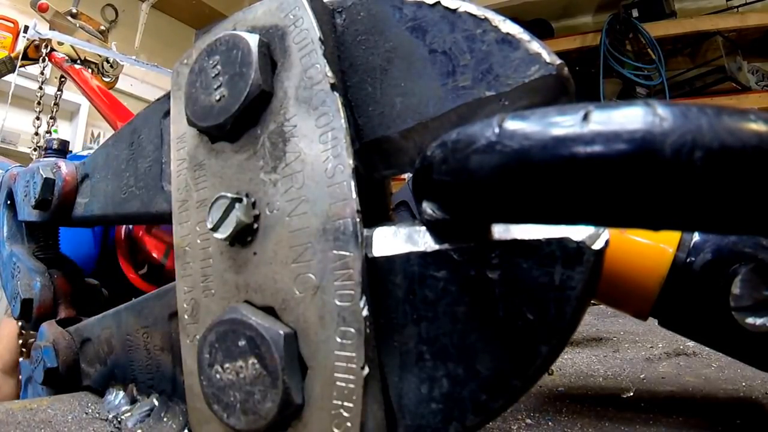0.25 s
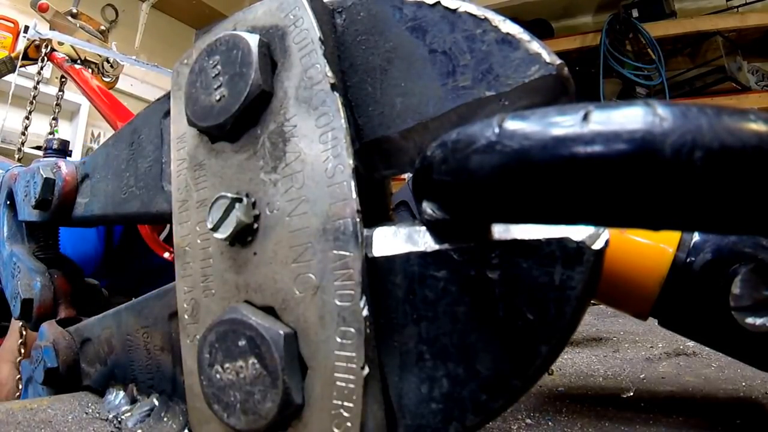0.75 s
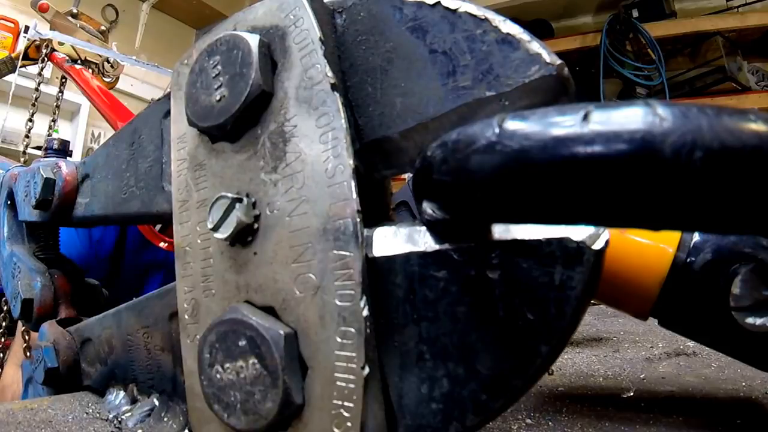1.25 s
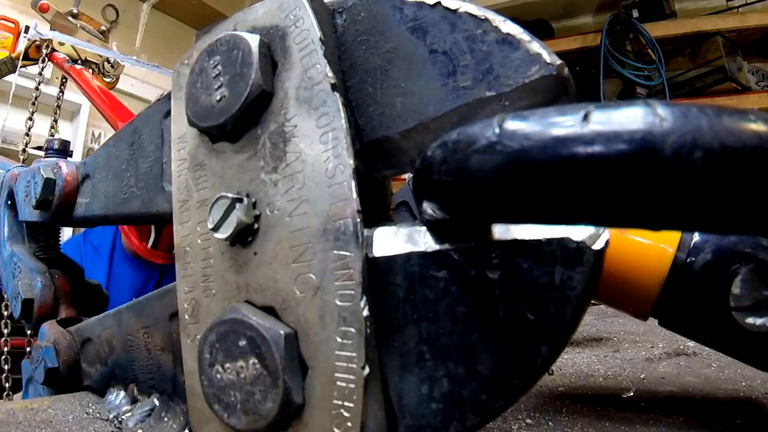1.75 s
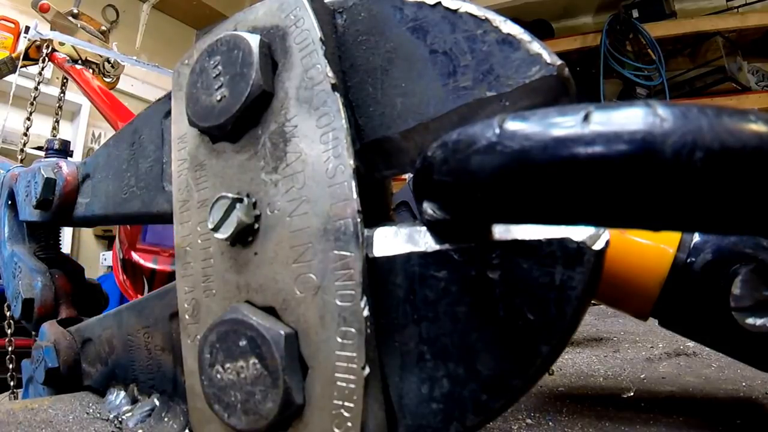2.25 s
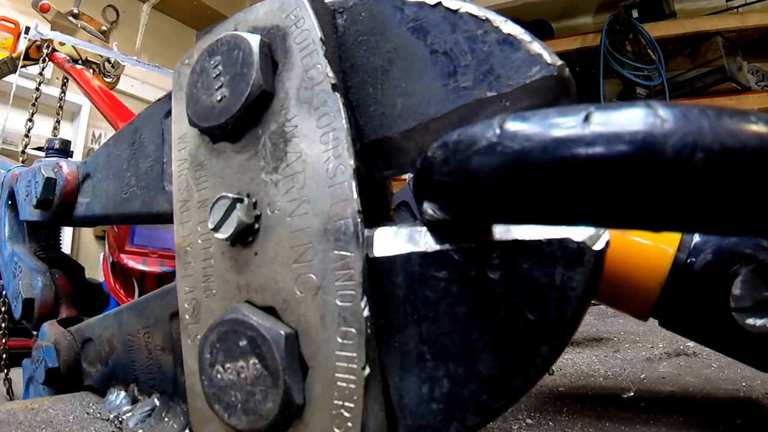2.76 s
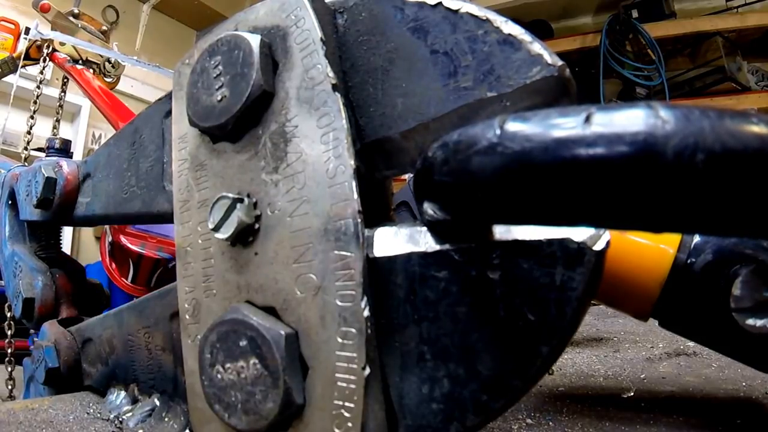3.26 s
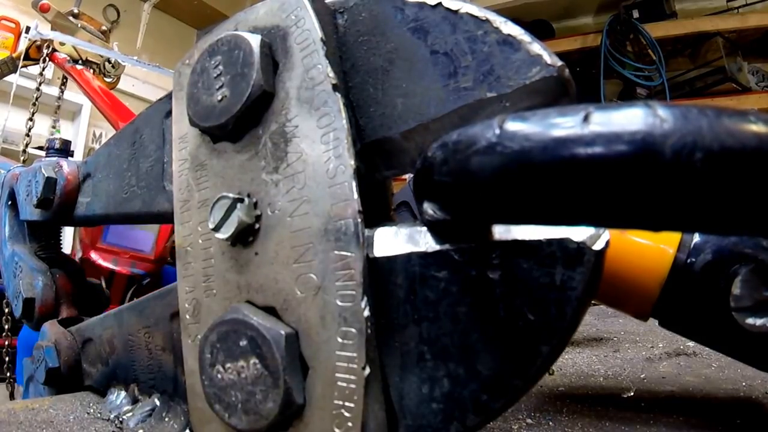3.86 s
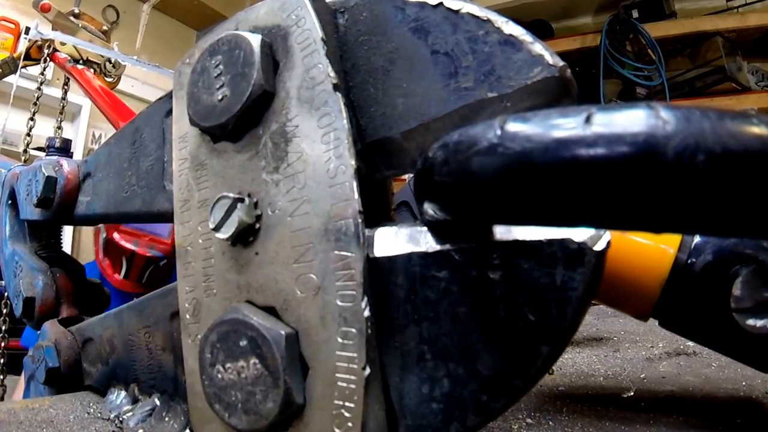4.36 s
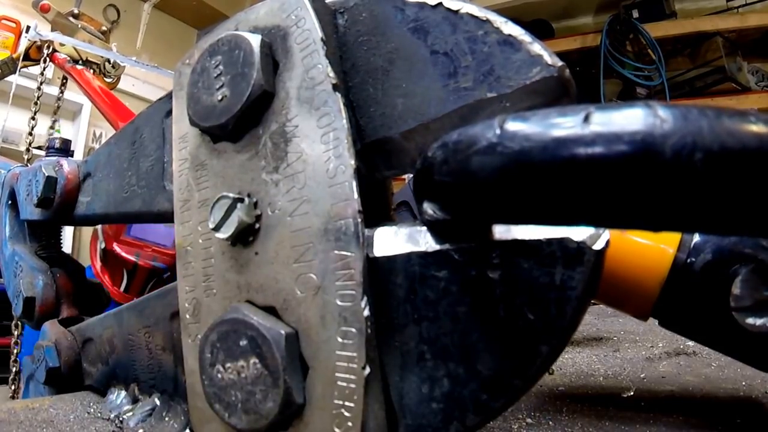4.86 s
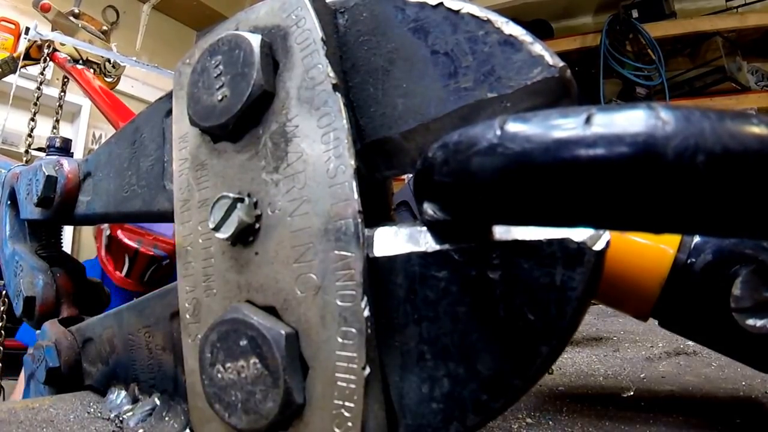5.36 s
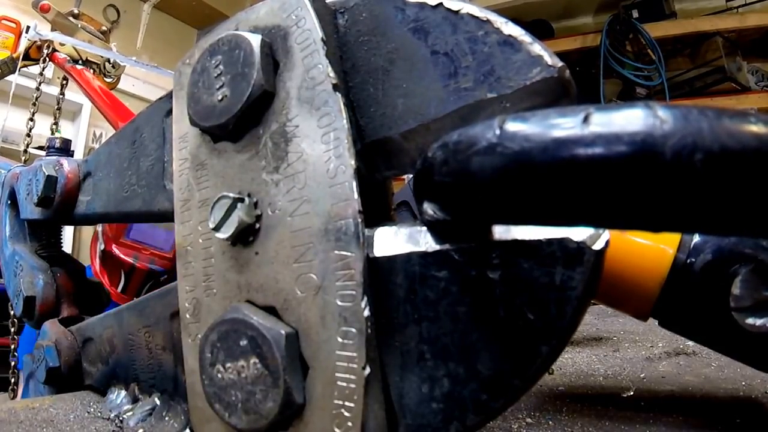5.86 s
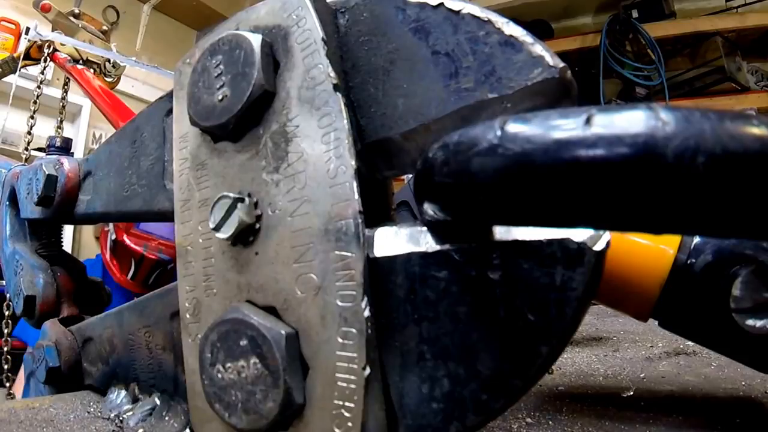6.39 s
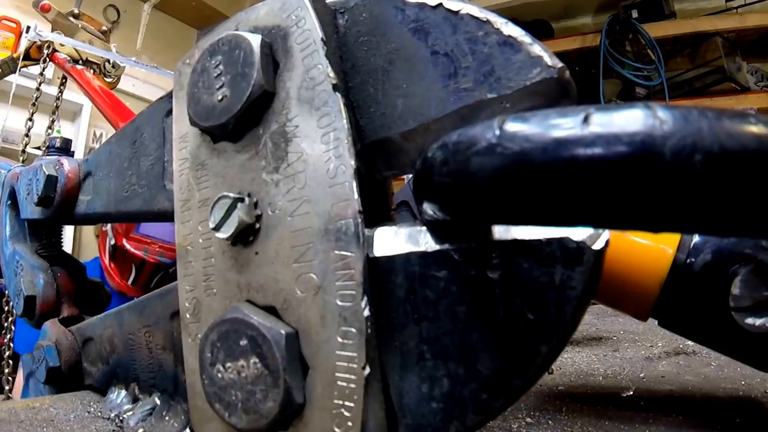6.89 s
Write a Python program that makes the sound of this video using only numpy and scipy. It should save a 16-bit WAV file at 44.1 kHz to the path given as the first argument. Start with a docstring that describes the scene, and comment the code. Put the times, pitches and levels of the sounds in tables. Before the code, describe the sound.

Soft chain rustle and light clinks over a quiet room and faint hiss, then a first strong ratchet clank near two and a half seconds. After a brief lull, a lever hoist clacks repeatedly, each stroke a tight run of bright steel snaps and woody-sounding rig thumps, plus low scraping and sway. Mono, close, contact-like microphone in a hard, short-reverberating workshop.

```python
"""Slack chain brushes softly, then a lever chain hoist clanks in a workshop as it is cranked, close to a
small camera standing on the loaded steel rig. Clanks are grainy noise bursts through the steel's modes; chain
drags and brushes as filtered grains. Jolts boom through the rig, mostly near 330 Hz, as swelling cosines;
single parts ring as wavering sines. Behind them the rig hums, scrapes and sways, and the shop answers."""
import sys
import numpy as np
from scipy import signal
from scipy.fft import rfft, irfft, next_fast_len
from scipy.io import wavfile
from scipy.ndimage import uniform_filter1d, map_coordinates

SR = 44100
rng = np.random.default_rng(int(sys.argv[2]) if len(sys.argv) > 2 else 0)


def gain_from_db(level_db):
    """Convert decibel levels to linear amplitude factors (20 dB per decade)."""
    decades = np.asarray(level_db, float) / 20
    return 10 ** decades


def generate_wav(sig):
    """Save sig (samples, or channels by samples) to the path in sys.argv[1] as 16-bit PCM at SR."""
    pcm = np.round(np.clip(np.atleast_2d(sig).T, -1, 1) * 32767).astype(np.int16)
    wavfile.write(sys.argv[1], SR, pcm)


N = 314433  # samples

# Modes of the hoist steel. Each row: centre in Hz, width in Hz, level in dB.
STEEL = [(850, 8.1, 1.5), (921, 8.3, 1), (1200, 250, -14.5), (1273, 15, 3.5), (1528, 46, -1.5),
         (1730, 50, 1), (2250, 63, -3.5), (2577, 42, -1), (2960, 27, -20.5), (3308, 13, -1.5),
         (4050, 18, -10), (4670, 46, -38), (4953, 66, -7), (5200, 17, -4), (6600, 17, -17), (7400, 56, -22),
         (9310, 70, -20.5)]
# Jolts through the rig, and a few long quiet hums of the rig while the lever is pulled (near 3.62, 4.31, 4.66,
# 5.32 and 5.51 s). Each row: time of the peak in seconds, level in dB, boom in Hz, nominal t60 in seconds.
JOLTS = [(.27, -28.5, 157.5, 0.18), (1.029, -31.5, 373, .11), (1.181, -34.5, 210, 0.13),
         (1.39, -42, 222, 0.17), (2.218, -27, 396, 0.14), (2.2744, -21, 360, 0.11),
         (2.3128, -18.5, 387, 0.033), (2.396, -17, 393, 0.056), (2.4103, -10.5, 316, 0.045),
         (2.429, -13, 396, 0.064), (2.4472, -12, 384, 0.077), (2.4689, -14, 313, 0.011),
         (2.5326, -7, 361, 0.03), (2.5485, -12, 288, 0.012), (2.682, -27.5, 420, 0.098),
         (2.738, -26, 333, 0.04), (3.2642, -20, 297, 0.039), (3.2785, -19, 339, 0.064),
         (3.303, -27, 323, .044), (3.327, -26, 328, 0.1), (3.362, -9, 308.4, 0.096),
         (3.4305, -19.5, 344, .14), (3.578, -25.5, 305, 0.094), (3.617, -41, 334, 0.089),
         (3.654, -4.5, 276, 0.016), (3.6864, -16, 276, 0.052), (3.7062, -26, 393, 0.055),
         (3.857, -26.5, 385, 0.032), (3.904, -25, 367, 0.039), (3.9757, -11.5, 346, 0.029),
         (3.99, -10, 387, 0.011), (4.1049, -12.5, 283, .038), (4.1303, -22, 252, 0.013),
         (4.312, -25.5, 307, 0.11), (4.3508, -14.5, 332, 0.03), (4.3786, -21.5, 383, 0.1),
         (4.4387, -11, 319, 0.097), (4.4967, -16.5, 299, 0.033), (4.563, -24.5, 305, 0.097),
         (4.66, -28.5, 332, 0.25), (4.7013, -22.5, 344, 0.12), (4.7424, -6.5, 275, .032),
         (4.7614, -23, 303, .04), (4.9865, -10.5, 326, 0.049), (5.0032, -14, 338, 0.036),
         (5.1178, -11.5, 378, 0.035), (5.276, -26, 321, 0.099), (5.315, -29.5, 335, 0.29),
         (5.3526, -16.5, 331, .036), (5.417, -13.5, 334, 0.017), (5.435, -19, 347, 0.082),
         (5.4516, -14.5, 310, 0.035), (5.511, -27, 335, 0.087), (5.556, -22, 347, 0.075),
         (5.6849, -22.7, 335, 0.046), (5.7008, -21, 332, 0.099), (5.7285, -7.5, 285, 0.042),
         (5.8214, -16, 380, 0.0088), (5.8691, -21.5, 335, 0.12), (5.9738, -11, 380, 0.007),
         (5.997, -15.5, 300, 0.025), (6.1074, -15.5, 384, 0.036), (6.3835, -23.5, 331.6, 0.23),
         (6.4859, -11.5, 315, 0.074), (6.5009, -20.5, 330, 0.04), (6.42, -35, 334, 0.14),
         (6.601, -25.5, 335, 0.13), (6.765, -30, 340, 0.13), (6.8418, -6.5, 305, 0.023),
         (6.8765, -25, 243, 0.11), (7.094, -18, 362, 0.032)]
# Spectrum of chain links rubbing, before any tilt. Each row: frequency in Hz, level in dB per Hz.
LINKS = [(320, 11.5), (550, 5), (793, 1.5), (872, 0), (958, 5), (1170, 0), (2790, 1), (5000, -7.5),
         (6470, -6.5), (11000, -37.5), (12900, -49), (14000, -74)]
# Low modes of the rig against the floor. Each row: centre in Hz, width in Hz, level in dB.
SCRAPE = [(121.8, 42.7, -1.9), (205.7, 86, 1), (263, 110, -1.17)]


def unit(x):
    """Scaled to rms 1."""
    return x / np.sqrt(np.mean(x ** 2) + 1e-20)


def along(points, hz):
    """(Hz, value) points read on a log frequency axis."""
    f, v = np.transpose(points)
    return np.interp(np.log(hz + 1), np.log(f + 1), v)


def curves(rows):
    """One value per sample for each column after the time."""
    s, *cols = np.transpose(rows)
    return [np.interp(np.arange(N) / SR, s, c) for c in cols]


def filtered(x, response):
    """x passed through a complex response of frequency."""
    m = next_fast_len(x.shape[-1] + 8192)
    spectrum = rfft(x, m) * response(np.fft.rfftfreq(m, 1 / SR))
    return irfft(spectrum, m)[..., :x.shape[-1]]


def tilted(spectrum, slope_db):
    """A spectrum leaning by slope_db per octave about 3 kHz, with no bass well under its first point."""
    def response(hz):
        bass = (hz / (.4 * spectrum[0][0])).clip(0, 1) ** 3
        octaves = np.log2((hz + 1) / 3000).clip(-3, 2)
        return bass * gain_from_db(along(spectrum, hz) + slope_db * octaves)
    return response


def body(modes):
    """Causal response of a few resonances (Hz, width Hz, dB), with alternating signs."""
    def response(f):
        return sum((-1) ** k * gain_from_db(db) * 1j * f * w / (c * c - f * f + 1j * f * w)
                   for k, (c, w, db) in enumerate(modes))
    return response


def grit(size, spread_db, grain_s):
    """Many tiny contacts: noise whose level wanders from grain to grain."""
    knots = rng.standard_normal(int(size / SR / .0005) + 4)
    grain = np.arange(size) / SR / max(grain_s, .0005)
    return rng.standard_normal(size) * gain_from_db(spread_db * map_coordinates(knots, [grain]))


def swells(rows, rest_db):
    """Gain that rises and falls as a bell around each (s, dB, rise s, fall s), powers added over a rest level."""
    t = np.arange(SR) / SR - .5
    power = np.full(N + 2 * SR, gain_from_db(2 * rest_db))
    for s, db, rise, fall in rows:
        power[round(s * SR):][:SR] += gain_from_db(2 * db) * np.exp(-(t / np.where(t < 0, rise, fall)) ** 2)
    return np.sqrt(power[SR // 2:][:N])


def clanks():
    """Each clank is a clump of micro-contacts, heard directly and through the steel's modes at new strengths."""
    # Pawl and link clanks. Each row: start in seconds, relative level in dB, rattle t60 in seconds,
    # brightness in dB per octave.
    strikes = [(.0215, -47, 0.12, 6), (0.211, -33.5, 0.23, 3.5), (.3471, -40.5, 0.2, 2.5),
               (0.5022, -34.5, .19, 1), (0.6858, -34, 0.21, 0.5), (1.152, -35.5, 0.34, -3.5),
               (1.3474, -41, 0.15, 7), (1.6285, -44, 0.075, 3.5), (1.8044, -27.5, 0.052, 1),
               (2.259, -34, 0.068, 0.5), (2.389, -44, 0.2, -10), (2.4486, -42, 0.061, -15),
               (2.526, -19, 0.083, 3), (2.6799, -33, 0.11, -1), (2.9723, -47.5, 0.063, -7),
               (3.312, -32, 0.12, -2), (3.3278, -22, .07, 5), (3.3513, -14, 0.05, 3),
               (3.478, -32.5, .055, -0.5), (3.5703, -33.5, 0.09, 2.5), (3.5944, -37.5, 0.19, 12),
               (3.6506, -23, 0.07, -1), (3.855, -45, 0.12, -7), (3.902, -38.5, 0.091, -5),
               (3.9455, -37.5, 0.53, -1.5), (3.9717, -15, 0.09, 5), (3.986, -32.5, 0.41, -2),
               (4.0981, -26, 0.089, -3), (4.134, -35.5, 0.023, 8), (4.168, -43, 0.023, 6),
               (4.284, -39.5, 0.23, -2.5), (4.346, -25.5, 0.18, -3.5), (4.3708, -42, 0.079, 9),
               (4.3962, -27, 0.098, -0.5), (4.4099, -16.5, 0.074, 3), (4.4268, -14, 0.05, 3),
               (4.4932, -27.5, 0.055, -2), (4.5588, -18, 0.053, 3), (4.6485, -34.5, 0.12, -2),
               (4.6742, -31, 0.22, 1.2), (4.6944, -28.5, .12, 3.5), (4.7357, -21, 0.056, 1),
               (4.789, -35, 0.027, 12), (4.9577, -36.5, 0.39, 0), (4.9808, -15.5, 0.11, 3),
               (5.1093, -31.5, 0.098, -2.2), (5.183, -47, 0.084, 15), (5.2654, -40, 0.039, -6.5),
               (5.3395, -27, 0.16, -2.5), (5.4049, -18.5, 0.16, 2.5), (5.4194, -18.5, 0.072, 0.5),
               (5.4406, -15, 0.038, 2.2), (5.6436, -29, 0.23, 1), (5.69, -23, 0.17, 1.3),
               (5.6992, -28.5, 0.2, 5), (5.7234, -20, 0.038, -3.5), (5.764, -36, 0.13, 4),
               (5.916, -39.5, 0.17, -5), (5.9699, -14.5, 0.049, 4.5), (6.0867, -35, 0.1, -0.5),
               (6.1674, -49, 0.049, 13), (6.235, -39.5, 0.011, 4.5), (6.4293, -27, 0.045, 2.5),
               (6.4451, -16, 0.096, 2.5), (6.4767, -17, 0.061, 1.5), (6.6638, -38.5, 0.051, -.6),
               (6.753, -37, 0.16, 2.5), (6.7693, -27, .14, 8), (6.8122, -25, .19, 3.5),
               (6.8383, -18.5, 0.045, 0.1), (6.9788, -43, 0.023, 0)]
    # Spectrum of the direct rattle. Each row: frequency in Hz, level in dB per Hz.
    clatter = [(320, -7), (550, 2.5), (2190, -5.5), (2440, -6.5), (2990, -1.5), (4190, -17), (4490, -4.5),
               (5350, -14.5), (6560, -8), (8140, -26.5), (11000, -35), (14000, -105)]
    rise_s, hold_s = .0015, .009  # contacts gather, keep coming, then thin out
    out, t = np.zeros(N + SR), np.arange(SR // 3) / SR
    hz, width, level = np.transpose(STEEL)
    width = np.maximum(width, hz / 40)  # parts pressed together damp each other
    for s, db, life, slope_db in strikes:
        contacts = grit(len(t), spread_db=2.6, grain_s=.002)
        burst = gain_from_db(-60 * (t - hold_s).clip(0) / max(life, .01) - 4)
        burst = burst * (1 - np.exp(-t / rise_s))
        luck = rng.standard_normal((len(hz), 2))
        strength = level + 2 * luck[:, 0] + slope_db * np.log2(hz / 3000).clip(-1, 2)
        pitch = hz * (1 + 0.023 * luck[:, 1])  # links seat differently each time
        rattle = burst * unit(filtered(contacts, tilted(clatter, slope_db)))
        ring = filtered(burst * unit(contacts), body(np.transpose([pitch, width, strength])))
        ring = filtered(ring, lambda f: 1 / (1 + 1j * f / 9000) ** 2)  # heavy steel carries little of the top
        out[round(s * SR):][:len(t)] += gain_from_db(db) * (gain_from_db(-3.5) * rattle + gain_from_db(10) * ring)
    return out[:N]


def jolts():
    """A jolt swells the rig's boom to an inward peak over a dull thud; the loose mount adds an overtone."""
    # jolts on the rig's own pitch are clean, those away from it come with more thud
    home_hz, clean_thud_db, thud_db_per_octave = 335, -25, 53
    # long booms also swell slowly, strong ones most
    shortest_rise_s, rise_per_t60 = 0.0021, 0.26
    out, t = np.zeros(N + SR), np.arange(SR // 3) / SR - .05
    for s, db, hz, t60 in JOLTS:
        away = min(abs(np.log2(hz / home_hz)), .4)  # octaves
        rise = shortest_rise_s + rise_per_t60 * t60 * gain_from_db(db / 2 - 31.6 * away)  # thuddy ones strike at once
        thud_db = clean_thud_db + thud_db_per_octave * away
        decay = gain_from_db(db - 60 * t.clip(0) / max(t60, .015))
        swell = decay * np.exp(-(t.clip(None, 0) / rise) ** 2)
        phase = 2 * np.pi * hz * t
        overtone = gain_from_db(-6) * swell * np.cos(2 * phase + 0.11)  # relatively stronger in hard jolts
        boom = np.cos(phase) + overtone
        thud = unit(filtered(rng.standard_normal(len(t)), lambda f: body(SCRAPE)(f) ** 2))
        out[round(s * SR):][:len(t)] += swell * (gain_from_db(thud_db) * thud - boom)
    return out[SR // 20:][:N]


def sweeps():
    """Slack links brush over one another in a soft swell."""
    # Slack chain sweeping past. Each row: time of the peak in seconds, rms level at the peak in dB,
    # rise in seconds, fall in seconds, brightness in dB per octave.
    brushes = [(0.052, -40.5, 0.061, 0.044, 5.5), (.85, -38, 0.02, 0.11, 4.5),
               (.98, -35.5, 0.023, 0.031, 5), (1.389, -36, 0.027, 0.059, 4),
               (1.708, -46.5, 0.047, 0.061, 5), (1.851, -41, 0.07, 0.091, 4.5),
               (1.931, -42.5, 0.041, 0.1, -4.5), (3.12, -30.5, 0.035, 0.049, -6),
               (3.239, -26.5, 0.078, 0.045, -5), (3.621, -35.5, 0.024, 0.021, 2.5),
               (6.29, -35.5, 0.03, 0.16, -5.5), (2.464, -46, 0.016, 0.088, 0),
               (0.249, -42.5, 0.013, 0.098, 0.5)]
    out, t = np.zeros(N + SR), np.arange(SR // 2) / SR - .2
    for s, db, rise, fall, slope_db in brushes:
        swell = np.exp(-.5 * (t / np.where(t < 0, rise, fall)) ** 2)
        contacts = grit(len(t), spread_db=1.5, grain_s=.003)
        brush = unit(filtered(contacts, tilted(LINKS, slope_db)))
        out[round(s * SR):][:len(t)] += gain_from_db(db) * swell * brush
    return out[SR // 5:][:N]


def drag():
    """Links slide and chatter over the sprocket, dull or bright by the run, and keep the steel singing."""
    # Chain running over steel. Each row: time in seconds, level in dB,
    # brightness in dB per octave (held within -4 to 4 below).
    runs = [(0, -45.5, 7), (.14, -51, 0.5), (.32, -54, -2.5), (.61, -52, -1.5), (1.06, -49, -1.5),
            (1.69, -61.5, 1), (1.83, -66, 17), (2.04, -62, -1.5), (2.6, -58.5, 16), (2.74, -73, 4),
            (3.1, -51.5, -9), (3.28, -36.5, -14), (3.49, -58, -2.5), (4.57, -54, -5.5), (4.83, -42, -6.5),
            (5.44, -60.5, 4.5), (6.49, -56.5, -1), (7.13, -64, 7)]
    level_db, slope_db = curves(runs)
    contacts = grit(N, spread_db=2, grain_s=.003)

    def rubbed(lean):
        links = filtered(contacts, tilted(LINKS, lean))
        return unit(filtered(links, lambda hz: 1 + body(STEEL)(hz)))

    dull, bright = rubbed(-4), rubbed(4)
    share = ((slope_db + 4) / 8).clip(0, 1)
    return gain_from_db(level_db) * ((1 - share) * dull + share * bright)


def chinks():
    """One pitched ring, rough and wavering in level and phase, with a bell-shaped fade."""
    # Short pitched rings of single links and bars, each fading within its own length. Each row:
    # start in seconds, pitch in Hz, level in dB before the waver, length in seconds.
    rings = [(0.221, 607, -42, .04), (0.223, 6600, -46.5, 0.059), (.32, 5800, -52, .031),
             (0.702, 485, -39.5, 0.059), (0.706, 6330, -45.5, 0.057), (.755, 3600, -48, 0.023),
             (1.16, 850, -47, 0.044), (1.161, 480, -31.5, 0.053), (1.86, 485, -44, 0.2),
             (.2, 478, -44, 0.14), (.81, 472, -45, 0.026), (2.531, 6600, -35, 0.027),
             (3.38, 850, -32.5, 0.057), (4.75, 850, -40.5, 0.087), (1.72, 485, -46.5, .047),
             (1.927, 2720, -62.5, 0.54), (2.55, 797, -57, 0.2), (2.732, 4100, -69, 0.093),
             (4.02, 7400, -42, 0.06), (4.013, 10400, -42, 0.03), (4.346, 900, -27, 0.043),
             (5.97, 830, -41, 0.1), (6.753, 980, -37, 0.02), (3.572, 972, -32.5, 0.014),
             (5.275, 845, -44, 0.09), (5.464, 4100, -54, 0.12), (6.273, 475, -32, 0.1),
             (6.769, 5160, -31, 0.012)]
    out, t = np.zeros(N + SR), np.arange(SR // 2) / SR
    for s, hz, db, length in rings:
        knots = rng.standard_normal((2, 60))  # 100 a second
        waver_db, slip = map_coordinates(knots, [[0 * t, 0 * t + 1], [t * 100] * 2])
        swell = gain_from_db(db + 3.6 * waver_db) * np.exp(-(t / length) ** 2) * (1 - np.exp(-t / 0.0005))
        out[round(s * SR):][:len(t)] += swell * np.sin(2 * np.pi * hz * t + .8 * slip)
    return out[:N]


def shake():
    """The rig hums around its jolts; each shove scrapes it on the floor and leaves it swaying."""
    # The rig's body. Each row: centre in Hz, width in Hz, level in dB.
    rig = [(335, 91, -2), (420, 76, -2), (485, 30, -5.5), (662, 20, -14), (850, 126, -16)]
    # Slow modes of the swaying rig. Each row: centre in Hz, width in Hz, level in dB.
    sway_modes = [(20.6, 8.5, 0), (66.2, 56, -4)]
    # Shoves of the rig on the floor. Each row: time of the peak in seconds, scrape in dB, sway in dB,
    # fall of the scrape in seconds.
    shoves = [(.26, -41, -49, 0.13), (.68, -39, -46, 0.06), (1.2, -39.5, -72, 0.048),
              (1.89, -33.5, -53, 0.16), (2.38, -35.5, -43.5, 0.083), (2.58, -44.5, -67, 0.12),
              (2.93, -49, -69, 0.069), (3.22, -29.5, -55, 0.046), (3.69, -36.5, -38, 0.12),
              (3.99, -33.5, -43.5, 0.063), (4.13, -35, -41, 0.071), (4.39, -42, -44, .06),
              (4.78, -34, -39, 0.15), (5.13, -38.5, -42, 0.076), (5.8, -31, -38, 0.075),
              (6.05, -43.5, -45.5, 0.12), (6.42, -42, -51, 0.15), (6.87, -37.5, -38, 0.1)]
    hum_db, hum_rise_s, hum_fall_s, hum_rest_db = -24, 0.049, 0.062, -78  # hum_db is relative to the jolt
    shove_rise_s, sway_lingers, scrape_rest_db, sway_rest_db = 0.045, 1.23, -66.5, -54

    def stiff(f):
        return body(SCRAPE)(f) ** 2 * (f / (f - 70j)) ** 2  # the floor gives no deep bass

    hum = unit(filtered(rng.standard_normal(N), lambda f: body(rig)(f) / (1 + 1j * f / 900) ** 2))
    scrape = unit(filtered(grit(N, spread_db=5, grain_s=0.0072), stiff))
    sway = unit(filtered(rng.standard_normal(N), lambda f: body(sway_modes)(f) ** 2))
    humming = swells([(s, db + hum_db, hum_rise_s, hum_fall_s) for s, db, *_ in JOLTS], hum_rest_db)
    scraping = swells([(s, db, shove_rise_s, fall) for s, db, _, fall in shoves], scrape_rest_db)
    swaying = swells([(s, db, shove_rise_s, sway_lingers * fall) for s, _, db, fall in shoves], sway_rest_db)
    return humming * hum + scraping * scrape + swaying * sway


def shop(x):
    """Each frequency of the room's answer dies at its own speed; a new tail for every third of a second."""
    # Decay of the workshop. Each row: frequency in Hz, t60 in seconds.
    room = [(300, 0.17), (1500, 0.3), (5000, 0.29), (11000, 0.39)]
    out, step = np.zeros(N + 2 * SR), SR // 3
    for start in range(0, N, step):
        hz, t, z = signal.stft(rng.standard_normal(SR // 2), SR, nperseg=256)
        decay = gain_from_db(-60 * t / along(room, hz)[:, None])
        tail = signal.istft(z * decay, SR, nperseg=256)[1]
        wet = signal.fftconvolve(x[start:start + step], tail / np.linalg.norm(tail))
        out[start + 200:][:len(wet)] += wet  # 200 samples late, about 4.5 ms
    return out[:N]


def still():
    """The quiet of the shop and the camera's own hiss, as steady shaped noise."""
    # Spectrum of the quiet. Each row: frequency in Hz, relative level in dB per Hz.
    quiet = [(15, -39), (25, -8), (344, -4), (703, -24), (1160, -23), (3260, -83), (4140, -62.5),
             (4480, -34.5), (11600, -41.5), (14000, -54)]
    return gain_from_db(-53.5) * unit(filtered(rng.standard_normal(N), tilted(quiet, 0)))


def dips():
    """Gain that drops for a few hundredths of a second, with edges of a few milliseconds."""
    # Moments when everything dips briefly. Each row: start in seconds, end in seconds, gain in dB.
    moments = [(2.481, 2.516, -11.5)]
    t = np.arange(N) / SR
    gain_db = sum(db * ((t > a) & (t < b)) for a, b, db in moments)
    return gain_from_db(uniform_filter1d(gain_db, size=150))


def scene():
    """The hoist sounds through the air of the shop, the rig straight into the camera."""
    hoist = clanks() + sweeps() + drag()
    ringing, boom = chinks(), jolts()
    echo = shop(gain_from_db(-8) * hoist + gain_from_db(-18) * ringing + gain_from_db(-5.5) * boom)
    air = hoist + ringing + echo
    return (dips() * (air + boom + shake() + still()))[None]


def roll_off(x):
    """The treble ends steeply here."""
    return signal.sosfilt(signal.butter(12, 14510, fs=SR, output="sos"), x)


def record(dry):
    """The microphone port rings in the treble, the top is cut at 14.4 kHz and the loudest peaks flatten."""
    # Resonances of the microphone port. Each row: centre in Hz, width in Hz, level in dB.
    port = [(6540, 96, 0), (10800, 220, -5)]

    def microphone(hz):
        return np.prod([1 + body([mode])(hz) for mode in port], axis=0) * (hz < 14400)

    heard = filtered(dry, microphone)
    heard = heard / (1 + np.abs(heard / .56) ** 6) ** (1 / 6)  # peaks level off toward 0.56
    return roll_off(heard)


dry = scene()
out = record(dry)
generate_wav(out)
```